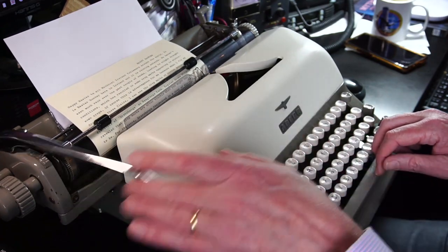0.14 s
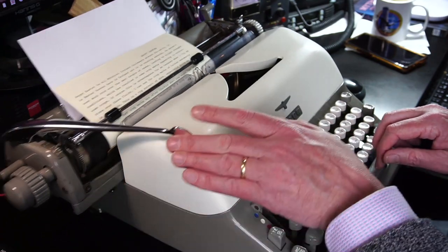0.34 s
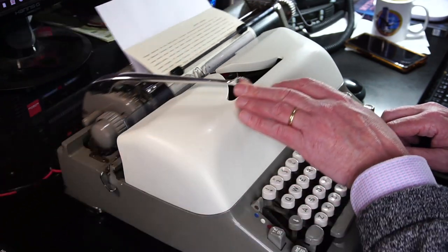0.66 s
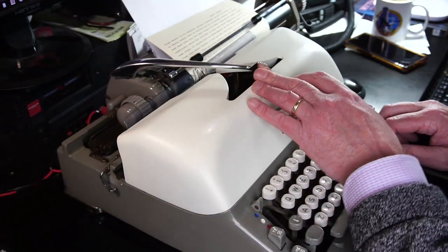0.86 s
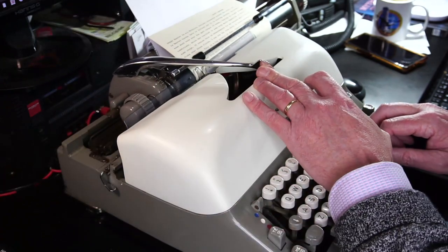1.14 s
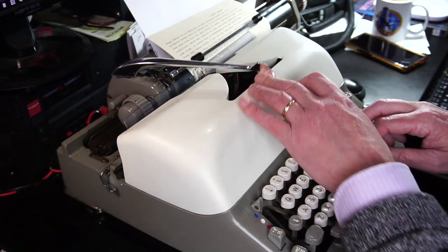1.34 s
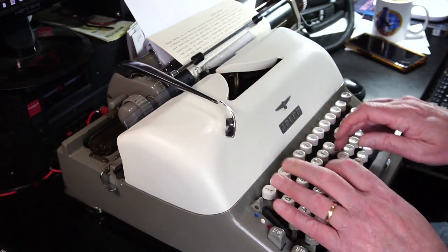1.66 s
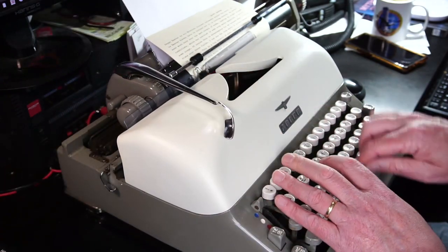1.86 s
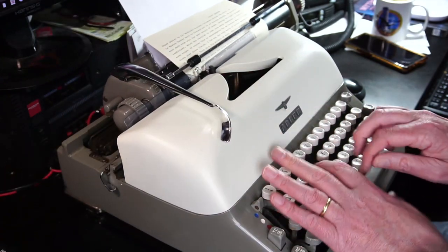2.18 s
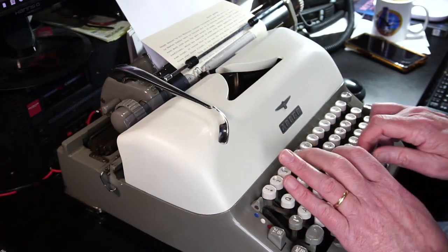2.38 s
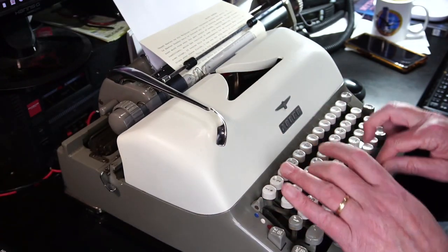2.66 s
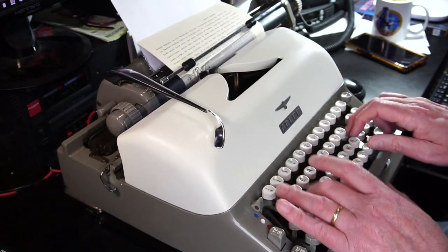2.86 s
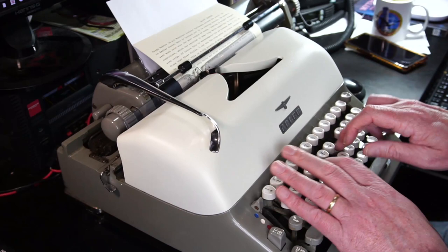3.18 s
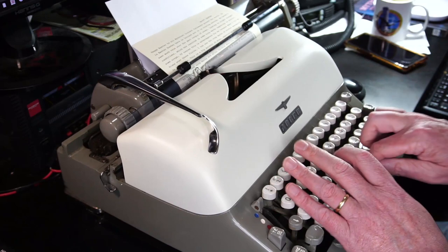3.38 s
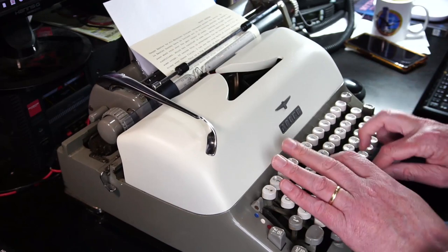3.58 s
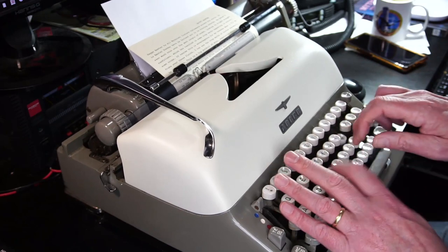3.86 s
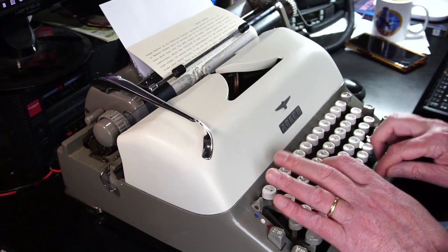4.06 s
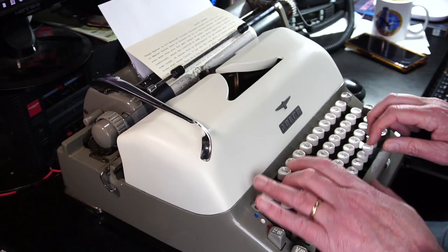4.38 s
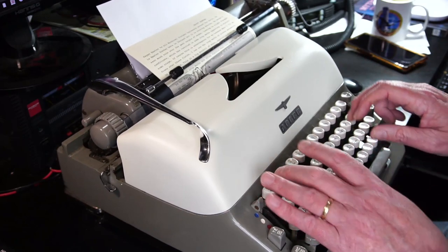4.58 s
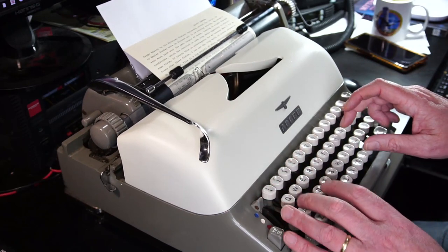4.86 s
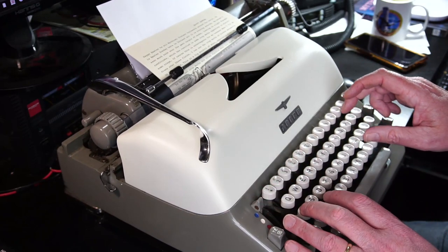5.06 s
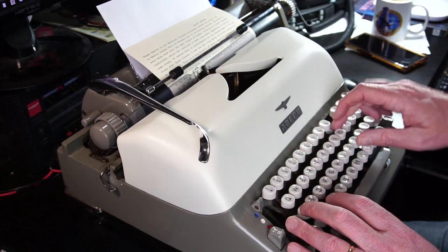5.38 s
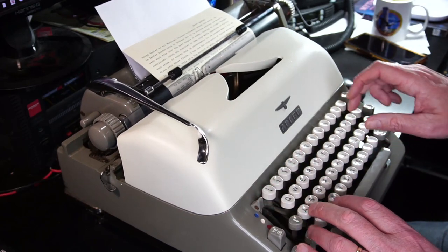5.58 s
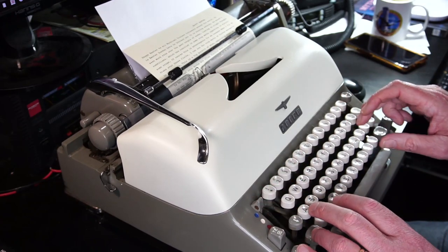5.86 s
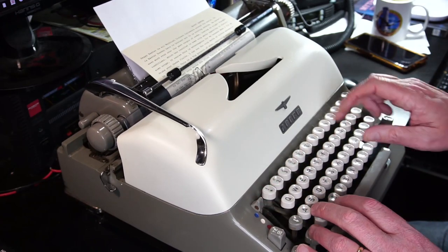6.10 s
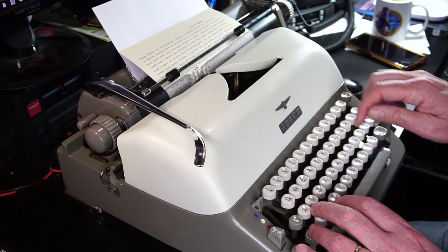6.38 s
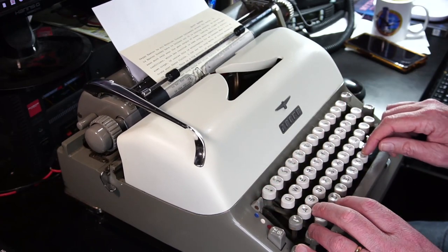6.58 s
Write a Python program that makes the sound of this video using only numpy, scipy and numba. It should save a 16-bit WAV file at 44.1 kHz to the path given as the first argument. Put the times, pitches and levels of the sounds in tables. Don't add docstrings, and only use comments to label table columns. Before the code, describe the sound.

A manual typewriter sits close to a stereo microphone in a small room with a quietly humming computer fan. From 0 to 0.3 s the return lever gives a scatter of thin steel clicks; the carriage then ratchets and rattles along its rail, loudest around 0.5 s, jolting dully and slowing to rest by 0.8 s. After a near-quiet lull come stop knocks at 1.1 and 1.25 s and lever snaps until 1.4 s. From 1.55 to 3.9 s typing is rapid and uneven: lever click, hard bright crack, loose metallic clatter back, springy return and soft low desk thump. Space-bar thuds fall around 4 s, then a lone crack at 4.3 s. Quiet hum, faint rustle and tiny touches follow, with soft strikes at 5.3 and 5.9 s, a firmer one at 6.1 s, a release, and a small click near 6.5 s. Echoes are short and faint.

```python
import sys
import numpy as np
from scipy import signal
from scipy.fft import rfft, irfft
from scipy.io import wavfile
from scipy.ndimage import uniform_filter1d, map_coordinates
from numba import njit

SR = 44100
rng = np.random.default_rng(int(sys.argv[2]) if len(sys.argv) > 2 else 0)


def unload_audio(sound):
    columns = np.transpose(np.atleast_2d(sound))
    steps = np.round(np.clip(columns, -1, 1) * 32767)
    wavfile.write(sys.argv[1], SR, steps.astype(np.int16))


def gain_from_db(level_db):
    decades = np.asarray(level_db, float) / 20
    return 10 ** decades


N = 296793

# (time [s], peak [dB], shiver of bar and ribbon [dB], run-up [dB], fall-back delay [s])
SLUG_HITS = [(1.5883, -9, -18.5, -29, .048), (1.8144, -9.5, -13, -19, 0.046), (2.087, -9, -13, -12, 0.052),
             (2.2252, -8.5, -17, -9, 0.048), (2.4176, -9, -15.5, -15, 0.046),
             (2.6868, -6.5, -22, -19, 0.037), (2.7989, -6, -25, -19, 0.029),
             (2.9517, -6.5, -20, -19.5, 0.047), (3.0635, -10.5, -17.5, -21, .039),
             (3.2655, -10, -15.5, -14.5, 0.052), (3.3947, -10, -12.5, -13.5, 0.063),
             (3.684, -8, -19.5, -15.5, .039), (3.846, -10.5, -12, -17.5, 0.041),
             (4.3113, -9, -14.5, -24.5, 0.041), (5.296, -23, -4.5, -23.5, 0.053),
             (5.877, -18.5, -8.5, -20.5, 0.044), (6.127, -11.5, -12.5, -16.5, 0.041)]
# (time [s], peak [dB], burst length [s], bounce delay [s], bounce [dB])
KEY_PRESSES = [(1.5428, -19, 0.013, 0.023, -36), (1.775, -14, 0.015, .012, -39.5),
               (2.0425, -9.5, 0.012, 0.014, -22.5), (2.37, -18.5, 0.012, 0.0053, -20),
               (2.642, -17.5, 0.013, .021, -18), (2.7694, -33, .002, .012, -52.5),
               (2.917, -20, 0.021, .012, -50), (3.224, -16.5, 0.0098, 0.011, -39),
               (3.6406, -8.5, 0.0025, 0.0093, -24.5), (3.815, -17, 0.012, 0.011, -29.5),
               (4.2635, -29, 0.043, 0.018, -19.5), (5.2623, -24, 0.019, .012, -45),
               (5.8378, -15.5, 0.0096, .012, -41), (6.0866, -24, 0.013, 0.0092, -26)]
# (time [s], peak [dB], catch delay [s], catch [dB], bright share [dB])
KEY_RETURNS = [(1.7354, -21, 0.0094, -22.5, -5), (1.94, -17, 0.02, -20.5, -7.5),
               (2.5146, -16.5, 0.024, -15.5, -9.5), (2.602, -24.5, .014, -15, -18.5),
               (3.1992, -20, 0.0085, -28, -6.5), (3.54, -14.5, 0.016, -20, -10),
               (3.772, -32.5, .012, -47, -1), (3.9763, -18, 0.016, -13, -9.5),
               (4.097, -16, 0.0093, -22, -25), (4.466, -19.5, 0.012, -22.5, -9.5),
               (5.422, -24.5, 0.0081, -24.5, -7), (6.012, -20.5, 0.0074, -20.5, -7.5),
               (6.2555, -22, 0.008, -21.5, -8)]
# (time [s], peak [dB], case share [dB], bright share [dB])
LEVER_SWINGS = [(.0094, -32.5, -15, -23), (0.05, -28.5, -30, -10), (.065, -37.5, -17, -13),
                (0.0865, -22, -33, -10), (0.0973, -18, -20.5, -25), (0.1213, -20.5, -38, -7),
                (.137, -17.5, -28, 0), (0.146, -26, -30, -6), (.1805, -25, -26.5, -16.5),
                (.224, -31, -14, -29), (0.269, -24.5, -12.5, -7), (0.3142, -18.5, -21, -1.5),
                (1.0781, -22.5, -10.5, -14), (1.256, -24, -4.5, -28), (1.268, -13, -40, -28),
                (1.288, -17, -37, -15.5), (1.367, -24, -21, -27), (1.402, -32.5, -19, -8)]
# (time [s], peak [dB], burst length [s])
CARRIAGE_JOLTS = [(0.341, -25, 0.011), (.398, -29, 0.0088), (0.423, -23, 0.0092), (0.467, -24, 0.014),
                  (0.5006, -21, 0.0065), (0.557, -30, .004), (0.581, -29, 0.024), (.652, -40, .004),
                  (0.673, -37, .003), (0.694, -33.5, .008), (0.733, -52, .004), (0.754, -46, 0.0036),
                  (0.764, -46, 0.003), (.891, -38.5, 0.016), (0.986, -39.5, 0.014), (1.219, -36, 0.0081)]
# (time [s], peak [dB], bright share [dB])
KEY_TOUCHES = [(1.115, -36, -5), (1.304, -41, -15), (1.478, -45, -13), (1.975, -24, -25), (4.088, -32, -6),
               (4.226, -57.5, 5), (4.531, -26.5, -23), (4.64, -54, -6), (4.985, -66, -3), (5.189, -65.5, 1),
               (5.58, -52.5, 5.5), (5.603, -52, 1.5), (5.642, -39.5, -8.5), (5.718, -48, -25),
               (5.741, -44, -20), (5.758, -35, -21), (6.4688, -35, -5.5), (6.605, -50, -20),
               (6.633, -45.5, -20)]

# (centre [Hz], width [Hz], level [dB])
PLATEN_MODES = [(2250, 1080, -2.5), (3380, 990, -2), (4650, 920, 0.5), (5790, 890, 0), (7540, 2600, -5.5)]
# (centre [Hz], width [Hz], level [dB])
LEVER_MODES = [(2020, 580, -3), (2435, 240, 4.5), (2860, 2040, -4.5), (4660, 1024, 1), (5320, 1960, -3)]
# (centre [Hz], width [Hz], level [dB])
CASE_MODES = [(184, 390, -11), (336, 135, -2.5), (442.6, 50.3, 0), (716, 168, -2), (875, 302, -4),
              (1480, 700, -7)]
# (centre [Hz], width [Hz], level [dB])
RAIL_MODES = [(1270, 330, -3.5), (1506, 270, 2), (1870, 320, 0.5), (2420, 350, 1), (3736, 400, -8.5),
              (4430, 400, -7), (6150, 500, -12), (8000, 3600, -24)]
# (centre [Hz], width [Hz], level [dB])
BEARING_MODES = [(2250, 90, -0.5), (4900, 900, 0), (6230, 500, -4)]
# (centre [Hz], width [Hz], level [dB])
CLOTH_MODES = [(1700, 120, 1), (2450, 330, -2), (3740, 200, -3)]

# (time [s], level [dB], pitch [Hz], time to fall 60 dB [s])
LONE_RINGS = [(.10, -34, 2450, 0.065), (.137, -32, 2300, 0.087), (.273, -34, 2500, .05),
              (.894, -54, 2220, 0.1), (.99, -40, 2250, 0.038), (1.082, -32.5, 2380, 0.03),
              (1.27, -32, 2460, 0.048), (1.37, -36.5, 2400, 0.045), (2.538, -25, 1660, 0.033),
              (2.554, -25.5, 1273, 0.033), (3.56, -35, 335, 0.1), (6.471, -39, 4900, 0.022),
              (5.644, -51, 5800, .03), (4.5, -50, 10200, .25), (5.646, -53, 2400, 0.086),
              (1.977, -31, 1500, .05), (6.471, -43, 4300, 0.027), (6.471, -44, 2400, 0.037),
              (6.635, -54.5, 6500, 0.027), (1.29, -50, 2450, .3)]
# (pitch [Hz], level under the blow [dB], time to fall 60 dB [s])
BAR_TONES = [(5000, -9.5, .03), (2193, -23.5, 0.027)]
# (pitch [Hz], level under the blow [dB], time to fall 60 dB [s])
KEY_TONES = [(4830, -21, .015), (1910, -22, .04)]
# (pitch [Hz], level under the blow [dB], time to fall 60 dB [s])
SPRING_TONES = [(1502, -14.5, .05), (2410, -17, .06)]
# (pitch [Hz], level under the blow [dB], time to fall 60 dB [s])
RACK_TONES = [(1875, -10.5, 0.045), (1415, -13.5, .05), (430, -14.5, .08)]

# (time [s], level [dB])
CARRIAGE_ROLL = [
    (0, -39),
    (.044, -58),
    (.166, -43),
    (.19, -49),
    (.304, -40),
    (.5, -35),
    (.576, -35.5),
    (.738, -46),
    (.83, -79),
]
# (time [s], level [dB])
MARGIN_STOPS = [
    (1.075, -37),
    (1.253, -34.5),
]
# (time [s], peak [dB], pitch [Hz])
DESK_THUMPS = [(.101, -41, 85), (.149, -41, 77), (.334, -37, 92), (.489, -39, 73.6), (.59, -37.5, 78.5),
               (1.087, -36, 73.5), (1.298, -39.5, 80), (1.439, -42.5, 86), (1.669, -41.5, 73),
               (1.956, -34, 110), (2.516, -32.5, 92), (2.604, -32.5, 91), (3.149, -35, 103),
               (3.465, -33, 95), (3.51, -39, 62.4), (3.609, -41.5, 96), (3.994, -31.5, 98),
               (4.096, -34.5, 104), (4.138, -36, 63), (4.179, -39.5, 51), (5.41, -48, 81), (6.02, -38, 97),
               (6.249, -44, 109)]
# (time [s], level [dB])
DESK_LEANS = [
    (1.1, -52.5),
    (4.08, -44),
    (4.4, -56),
    (4.65, -62),
    (4.9, -72),
]

# (frequency [Hz], level per Hz [dB])
AIR_COLOUR = [(65, -39), (110, 0), (124, -20.5), (150, -14.5), (169, -22), (217, -22.5), (269, -24),
              (303, -25), (464, -35.5), (564, -30), (1110, -48), (1960, -52.5), (2470, -39.5),
              (3720, -54.5), (11500, -60.5), (15000, -101.5), (22000, -120)]
# (pitch [Hz], level [dB])
HUM_TONES = [
    (90, -73.5),
    (100.2, -60),
    (143, -68.5),
    (300, -79.5),
]
# (time [s], level [dB])
SLEEVE_RUSTLE = [
    (4.5, -60.5),
    (4.9, -76),
    (5.15, -74.5),
    (5.6, -72.5),
    (5.8, -65.5),
    (6.3, -75),
    (6.5, -65.5),
    (6.73, -66.5),
]
# (frequency [Hz], time to fall 60 dB [s])
ROOM_DECAY = [(300, 0.5), (1500, 0.25), (5000, 0.28), (12000, 0.29)]

FALL_BACK_DB = -17.5
CLACK_LAG_S, CLACK_DB = 0.011, -9.5
BLOW_FLOOR_HZ = 1500

KEY_CASE_DB, KEY_BRIGHT_DB = -17, -6.5
BOUNCE_CASE_DB, BOUNCE_BRIGHT_DB = -14.5, -9
RETURN_CASE_DB, CATCH_CASE_DB, CATCH_DULLER_DB = -12.5, -14, -2.5
JOLT_CASE_DB, JOLT_BRIGHT_DB, TOUCH_CASE_DB = -12.5, -42.5, -12.5
BOUNCE_S, RETURN_S, CATCH_S, LEVER_S, TOUCH_S = 0.0079, 0.0063, 0.0061, 0.004, 0.0019
LINGER_DB, LINGER_S = -44, 0.099
RING_SCATTER, RACK_SCATTER = 0.07, 0.04

COAST_DB, COAST_ENDS_S = -65.5, 1.4
FRAME_DB, HISS_DB, STOP_FALL_S = -2, -28, 0.03

PUSH_LEAD_S, PUSH_DB, PUSH_HZ = 0.035, -34, 92
LANDING_LAG_S, LANDING_DB, LANDING_HZ = 0.052, -44, 92
SHUDDER_DB, SHUDDER_RISE_S, SHUDDER_FALL_S, SHUDDER_REST_DB = -18.5, 0.04, 0.099, -66.5
SWAY_DB, SWAY_RISE_S, SWAY_FALL_S, SWAY_REST_DB = -46, 0.05, 0.052, -81

AIR_DB = -64.5
WHINE_HZ, WHINE_DB, WHINE_ENDS_S = 12893, -85, 5.3
DRAG_S, DRAG_DB, DRAG_RISE_S, DRAG_FALL_S = 6.3, -65, 0.14, 0.4
MONO_BELOW_HZ = 300
LEFT_RIGHT = np.array([[1], [-1]])


def slugs():
    s, db, shiver_db, run_db, delay = np.transpose(SLUG_HITS)
    run = bursts(s - 0.011, run_db + 1, 0.0067, 0.0025) + bursts(s - 0.03, run_db - 13.5, 0.018, 0.015)
    run = run * grit(2.2, 0.3)
    flight = body(run, LEVER_MODES) + gain_from_db(-3) * bright(run)

    crack = bursts(s, db + 5, 0.001, 0.0022) * grit(1.5, 0.35)
    shiver = bursts(s, db + shiver_db, 0.00092, 0.041) * grit(2.5, 0.2)
    blow = crack + shiver
    hard = body(blow, PLATEN_MODES) + gain_from_db(-10) * bright(np.abs(blow) * grit(0, 0.5))
    hard = signal.sosfilt(signal.butter(2, BLOW_FLOOR_HZ, "high", fs=SR, output="sos"), hard)

    land = bursts(s + delay - 0.012, FALL_BACK_DB - 11, 0.013, 0.03)
    clack = bursts(s + delay + CLACK_LAG_S, FALL_BACK_DB + CLACK_DB, 0.0012, 0.0027)
    fall = body((land + clack) * grit(2.2, 0.5), LEVER_MODES)
    case = gain_from_db(-3.5) * body(land * grit(1.8, 0.075), CASE_MODES)
    return hard + flight + fall + case


def clicks():
    # time, peak dB, case share dB, bright share dB, burst length s
    rows = [(s, db, KEY_CASE_DB, KEY_BRIGHT_DB, length) for s, db, length, _, _ in KEY_PRESSES]
    rows += [(s + lag, db, BOUNCE_CASE_DB, BOUNCE_BRIGHT_DB, BOUNCE_S) for s, _, _, lag, db in KEY_PRESSES]
    rows += [(s, db, RETURN_CASE_DB, share, RETURN_S) for s, db, _, _, share in KEY_RETURNS]
    rows += [(s + lag, db, CATCH_CASE_DB, share + CATCH_DULLER_DB, CATCH_S)
             for s, _, lag, db, share in KEY_RETURNS]
    rows += [(*row, LEVER_S) for row in LEVER_SWINGS]
    rows += [(s, db, JOLT_CASE_DB, JOLT_BRIGHT_DB, length) for s, db, length in CARRIAGE_JOLTS]
    rows += [(s, db, TOUCH_CASE_DB, share, TOUCH_S) for s, db, share in KEY_TOUCHES]
    s, db, case_db, bright_db, length = np.transpose(rows)

    chatter = bursts(s, db - 24, 0.013, 0.011) + bursts(s, db + LINGER_DB, 0.02, LINGER_S)
    rattle = bursts(s, db - 9, 0.0032, length) + chatter
    levers = body(rattle * grit(0.66, 0.5), LEVER_MODES)
    spark = bursts(s, db + bright_db - 3.5, 0.0063, 1.1 * length)
    spark = spark + bursts(s, db + bright_db - 24.5, 0.004, 0.029)
    sizzle = bright(spark * grit(1.5, 0.95))
    answer = bursts(s, db + case_db - 4, 0.0043, 3.18 * length)
    return levers + sizzle + body(answer * grit(1.4, 0.12), CASE_MODES)


def rings():
    out, t = np.zeros((2, N + SR)), np.arange(SR // 2) / SR
    rows = [(*row, 0) for row in LONE_RINGS]
    families = ((SLUG_HITS, BAR_TONES, RING_SCATTER), (KEY_PRESSES, KEY_TONES, RING_SCATTER),
                (KEY_RETURNS, SPRING_TONES, RING_SCATTER), (CARRIAGE_JOLTS, RACK_TONES, RACK_SCATTER))
    for events, tones, scatter in families:
        rows += [(row[0], row[1] + db, hz, t60, scatter) for row in events for hz, db, t60 in tones]
    for (s, db, hz, t60, scatter), chance in zip(rows, rng.standard_normal((len(rows), 3))):
        fade = gain_from_db(db + 30 * scatter * chance[0] - 60 * t / t60) * np.minimum(t / 0.0018, 1)
        turn = 2 * np.pi * hz * (1 + scatter * chance[1]) * t
        i = int(s * SR)
        out[:, i:i + len(t)] += fade * np.sin([turn, turn + 10 * scatter * chance[2]])
    return out[:, :N]


def carriage():
    t = np.arange(N) / SR
    moving = t < COAST_ENDS_S
    roll = gain_from_db(np.interp(t, *np.transpose(CARRIAGE_ROLL)) - 2) * moving
    chance = rng.standard_normal((200, 2)).T
    trips = np.cumsum(0.0088 * (1 + 0.3 * np.tanh(chance[0])))
    teeth = 0.2 + bursts(trips, 3 + 2.8 * chance[1], 0.0005, 0.003)
    rattle = body(roll * teeth * grit(2.7, 0.32), RAIL_MODES)
    hiss = (gain_from_db(HISS_DB) * roll + gain_from_db(COAST_DB) * moving) * bright(grit(1.5, 0.73))
    drift = gain_from_db(COAST_DB - 1.8) * moving * body(grit(2.4, 0.55), BEARING_MODES)
    frame = [(151.6, 46, -8), (417, 132, -2), (560, 177, -6), (677, 180, -6.5)]  # (Hz, width Hz, dB)
    shake = gain_from_db(FRAME_DB) * roll + bursts(*np.transpose(MARGIN_STOPS), 0.019, STOP_FALL_S)
    return rattle + hiss + drift + body(shake * teeth * grit(1.6, 0.15), frame)


def desk():
    out, t = np.zeros(N), np.arange(SR // 5) / SR
    knocks = DESK_THUMPS + [(row[0] - PUSH_LEAD_S, PUSH_DB, PUSH_HZ) for row in SLUG_HITS]
    knocks += [(row[0] + LANDING_LAG_S, LANDING_DB, LANDING_HZ) for row in SLUG_HITS]
    for s, db, hz in knocks:
        swell = (t / 0.015) * np.exp(1 - t / 0.011)
        swing = gain_from_db(db + 2) * swell * np.sin(2 * np.pi * hz * t)
        i = int(s * SR)
        out[i:i + len(t)] += swing[:N - i]
    s, db, _ = np.transpose(knocks)
    shudder = gain_from_db(SHUDDER_REST_DB) + bursts(s, db + SHUDDER_DB, SHUDDER_RISE_S, SHUDDER_FALL_S)
    sway = gain_from_db(SWAY_REST_DB) + bursts(s, db + SWAY_DB, SWAY_RISE_S, SWAY_FALL_S)
    sway = sway + bursts(*np.transpose(DESK_LEANS), 0.1, SWAY_FALL_S)
    for size, hz, width in ((sway, 26, 12), (shudder, 63, 22)):
        mode = [(hz, width, 0)]
        rumble = body(body(grit(0, 0.04), mode), mode)
        out = out + level(rumble, 0) * size
    return out


def air():
    t, hz = np.arange(N) / SR, np.maximum(np.fft.rfftfreq(N, 1 / SR), 1)
    colour_hz, colour_db = np.transpose(AIR_COLOUR)
    colour = gain_from_db(np.interp(np.log(hz), np.log(colour_hz), colour_db))
    mid, side = rfft(rng.standard_normal((2, N))) * colour
    fans = level(irfft(mid + np.minimum(hz / 2500, 0.9) * side * LEFT_RIGHT, N), AIR_DB + 8.5)
    rustle = gain_from_db(np.interp(t, *np.transpose(SLEEVE_RUSTLE))) * body(grit(2, 0.59), RAIL_MODES)
    drag = bursts(DRAG_S, DRAG_DB, DRAG_RISE_S, DRAG_FALL_S) * body(grit(2, 0.7), CLOTH_MODES)
    whine = gain_from_db(WHINE_DB + 3) * np.sin(2 * np.pi * WHINE_HZ * t) * (t < WHINE_ENDS_S)
    hum = sum(np.sqrt(2) * gain_from_db(db) * np.sin(2 * np.pi * pitch * t) for pitch, db in HUM_TONES)
    return fans + rustle + drag + whine + hum


def room(x):
    t = np.arange(SR // 2) / SR
    tails = [sum(svf(rng.standard_normal(len(t)), float(hz), 1.97 * hz) * gain_from_db(-60 * t / t60)
                 for hz, t60 in ROOM_DECAY) for _ in x]
    spectra = rfft(np.array(tails) * (t > 0.004))
    power = np.abs(spectra) ** 2
    spectra = spectra * np.sqrt(uniform_filter1d(power, size=600) / uniform_filter1d(power, size=16))
    tails = irfft(spectra) * np.clip(4 - 10 * t, 0, 1)
    source = x.mean(axis=0)
    mid, side = (signal.fftconvolve(source, h / np.sqrt(np.sum(h ** 2)))[:N] for h in tails)
    side = signal.lfilter(*signal.butter(2, 1500, "high", fs=SR), side)
    tremble = level(svf(rng.standard_normal(N), 60., 160.), 5)
    mid, side = (map_coordinates(c, [np.arange(N) + tremble], order=3) for c in (mid, side))
    return mid + side * LEFT_RIGHT


def level(x, db):
    return x * gain_from_db(db) / np.sqrt(np.mean(x ** 2))


@njit
def svf(x, hz, width):
    y, b, l = np.empty(len(x)), 0., 0.
    g, k = np.tan(np.pi * hz / SR), width / hz
    for i in range(len(x)):
        v = (b + g * (x[i] - l)) / (1 + g * (g + k))
        b, l, y[i] = 2 * v - b, l + 2 * g * v, k * v
    return y


@njit
def follow(x, attack, release):
    e, out = 0., np.empty(len(x))
    for i in range(len(x)):
        e += (x[i] - e) * (attack if x[i] > e else release)
        out[i] = e
    return out


def grit(spread_db, apart):
    draws = np.minimum(rng.exponential(size=N // 24 + 1), 3)
    size = gain_from_db(np.repeat(spread_db * draws, 24)[:N])
    mid, side = rng.standard_normal((2, N)) * size / np.sqrt(np.mean(size ** 2))
    return mid + apart * side * LEFT_RIGHT


def body(x, modes):
    norm = np.sqrt(sum(gain_from_db(db) ** 2 * np.pi * width / SR for _, width, db in modes))
    out = np.zeros(x.shape)
    for k, (hz, width, db) in enumerate(modes):
        sign = (-1) ** k
        out += sign * gain_from_db(db) * np.array([svf(c, float(hz), float(width)) for c in x])
    return out / norm


def bright(x):
    x = signal.sosfilt(signal.butter(2, 7500, "high", fs=SR, output="sos"), x)
    return 1.18 * signal.lfilter(*signal.butter(1, 11000, fs=SR), x)


def bursts(s, db, rise, fall):
    out = np.zeros(N)
    for s, db, rise, fall in np.broadcast(s, db, rise, fall):
        t = np.arange(int((rise + 8 * abs(fall)) * SR)) / SR
        shape = np.minimum(t / rise, 1) ** 2 * np.exp(-np.maximum(t - rise, 0) / max(fall, 0.001))
        i = int(s * SR)
        out[i:i + len(t)] += gain_from_db(db) * shape[:N - i]
    return out


def scene():
    machine = slugs() + clicks() + carriage() + rings()
    mid = machine.mean(axis=0)
    machine = mid + signal.lfilter(*signal.butter(1, MONO_BELOW_HZ, "high", fs=SR), machine - mid)
    lean = 0.07 * body(machine, [(8000, 4000, 0)]) - 0.045 * body(machine, CASE_MODES[4:])
    near = machine + lean * LEFT_RIGHT + desk() + air()
    near = np.array([near[0], np.roll(near[1], 1)])
    return near + gain_from_db(-10) * room(machine)


def low_pass(x):
    return signal.sosfilt(signal.butter(12, 16800, fs=SR, output="sos"), x)


def record(dry):
    peak = follow(np.abs(dry).max(axis=0), 1 / (0.0014 * SR), 1 / (0.024 * SR))
    gain = np.minimum(gain_from_db(-19) / (peak + 1e-9), 1) ** 0.55
    ahead = int(0.0024 * SR)
    gain = np.append(gain[ahead:], np.ones(ahead))
    soft = np.tanh(1.124 * dry * gain) / 1.073
    cut = signal.ellip(12, 0.3, 70, 15900, fs=SR, output="sos")
    return low_pass(signal.sosfilt(cut, soft))


dry = scene()
out = record(dry)
unload_audio(out)
```